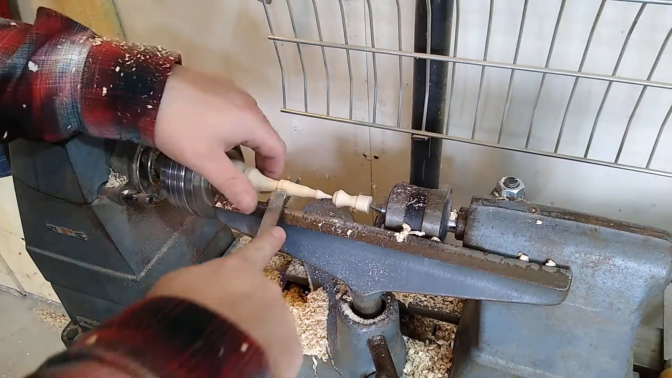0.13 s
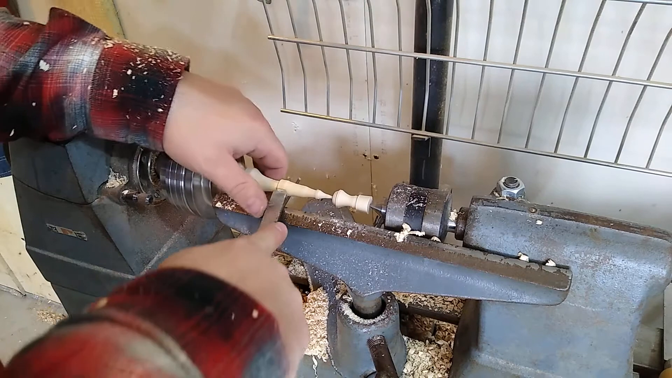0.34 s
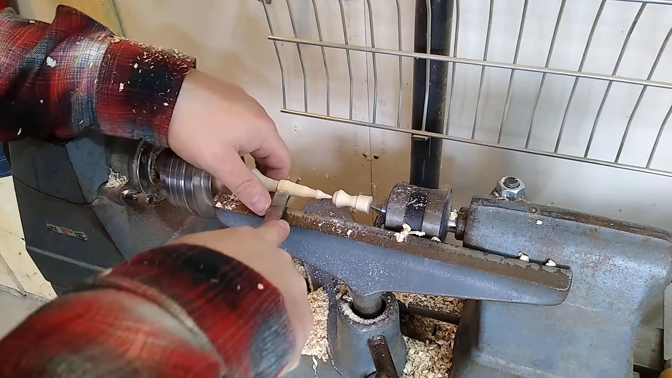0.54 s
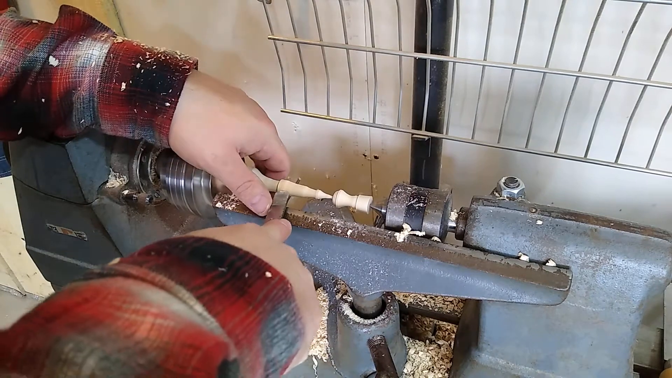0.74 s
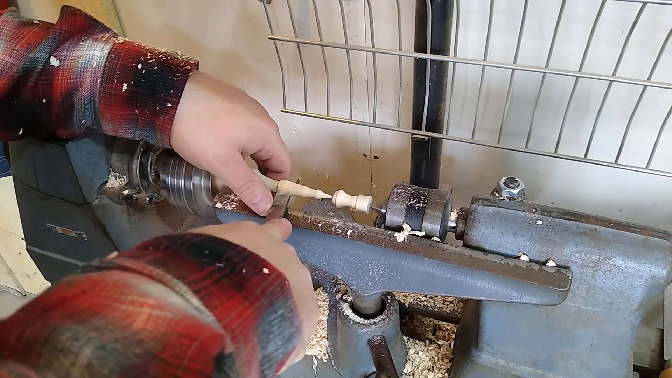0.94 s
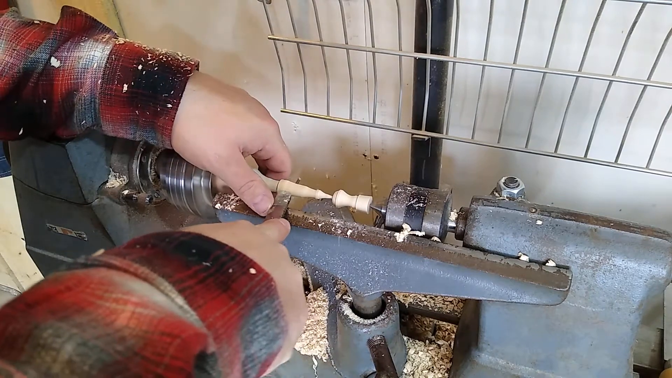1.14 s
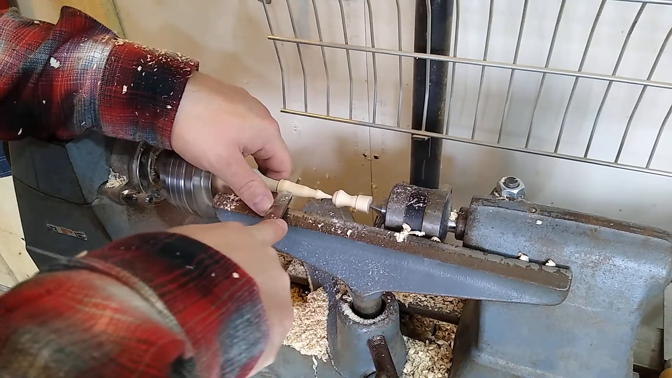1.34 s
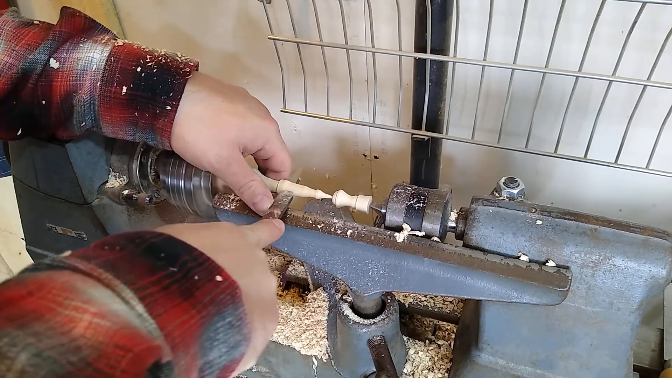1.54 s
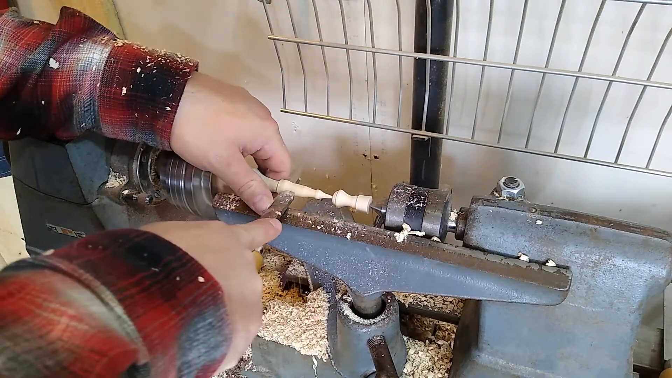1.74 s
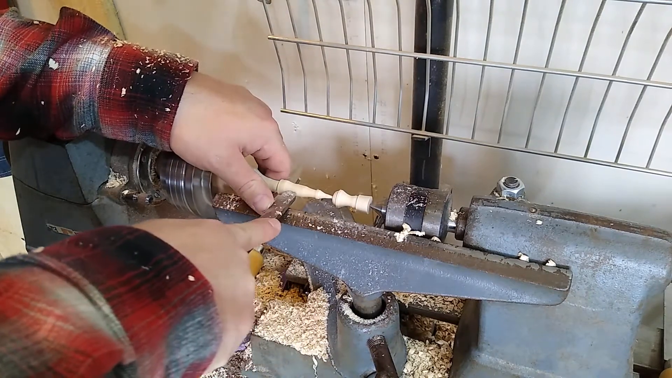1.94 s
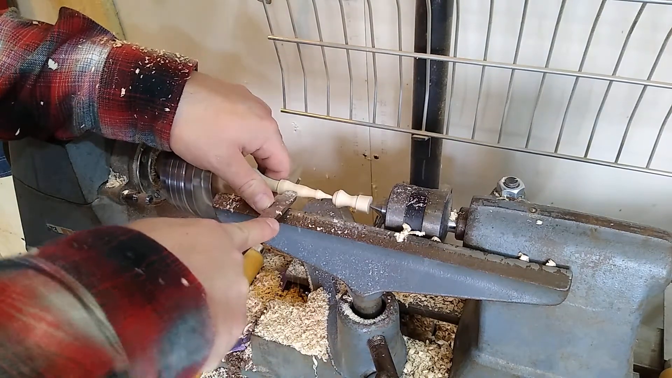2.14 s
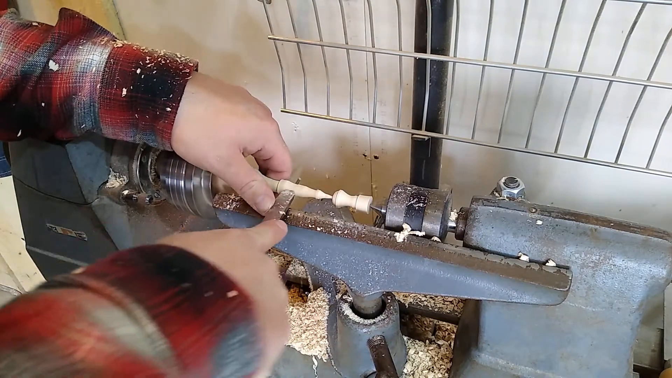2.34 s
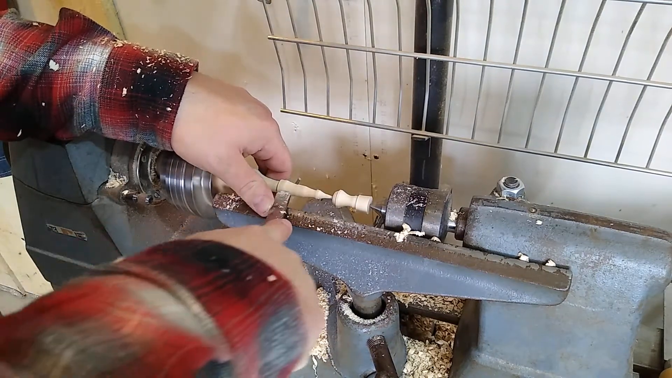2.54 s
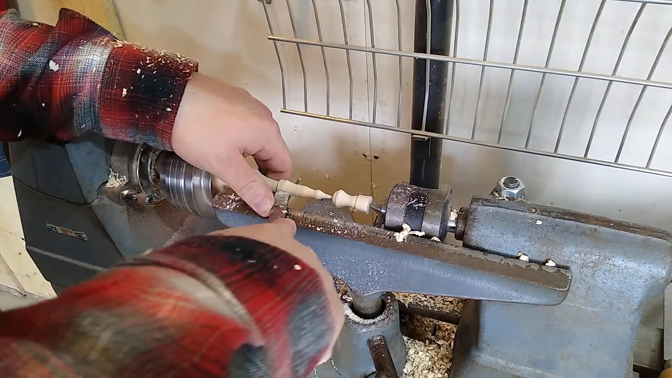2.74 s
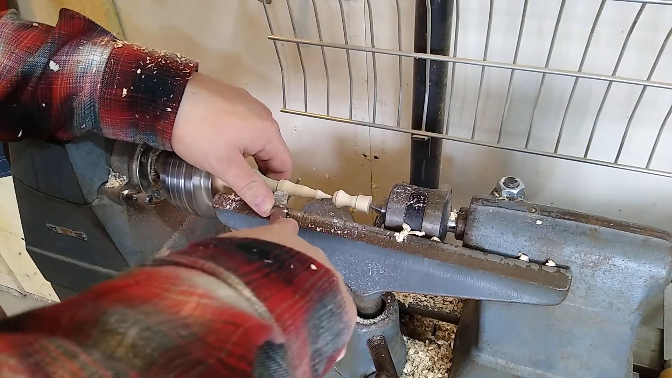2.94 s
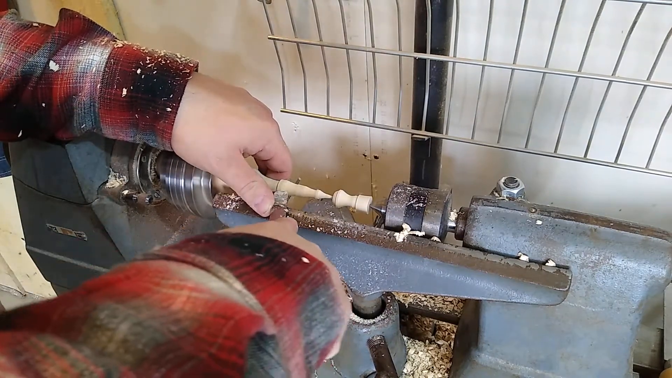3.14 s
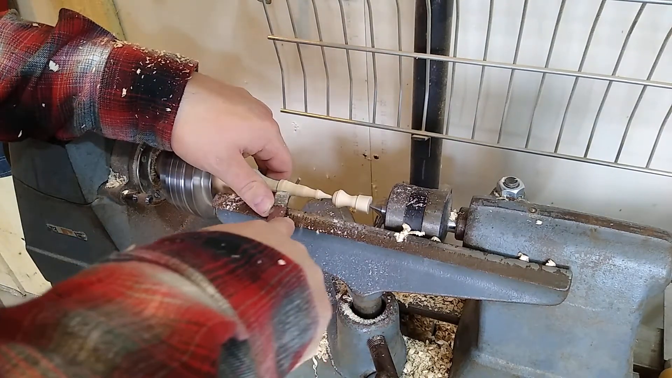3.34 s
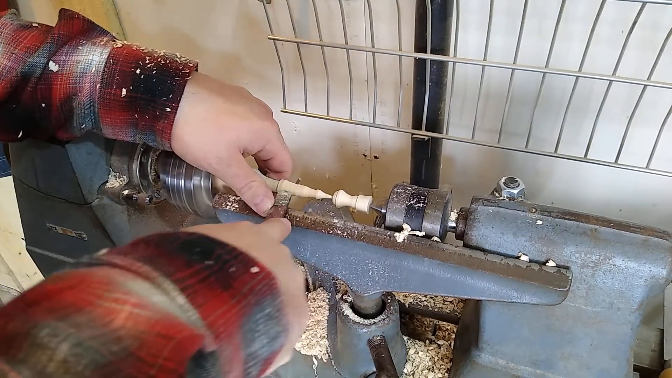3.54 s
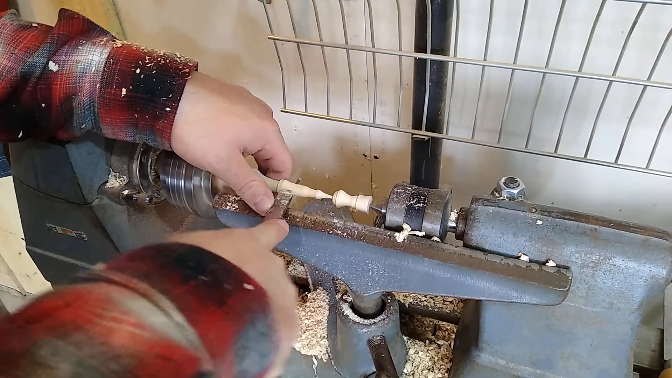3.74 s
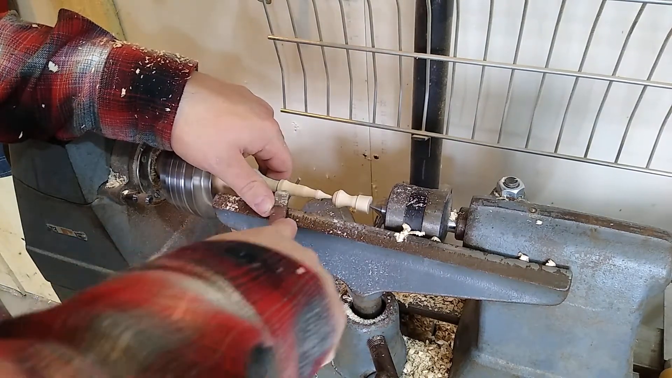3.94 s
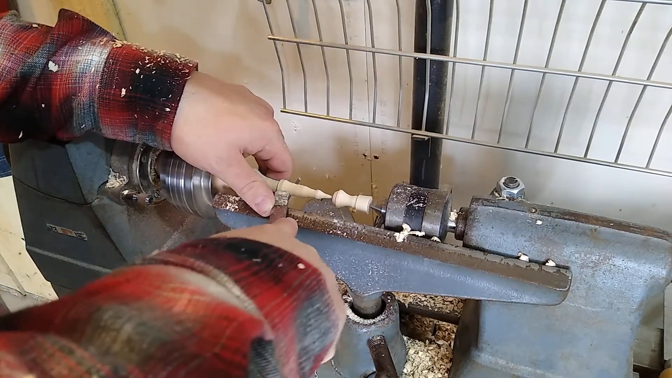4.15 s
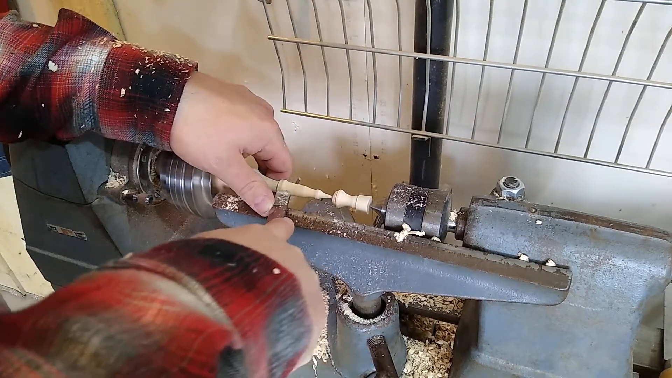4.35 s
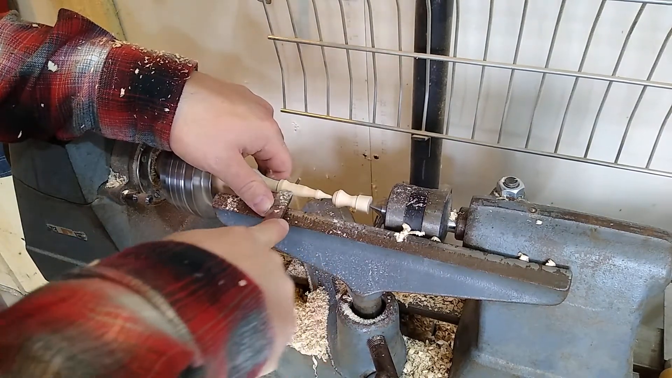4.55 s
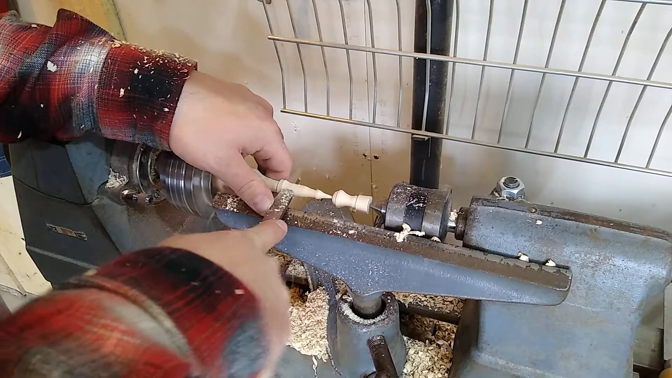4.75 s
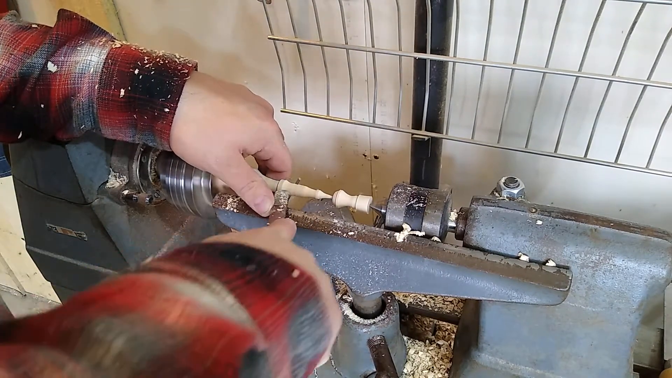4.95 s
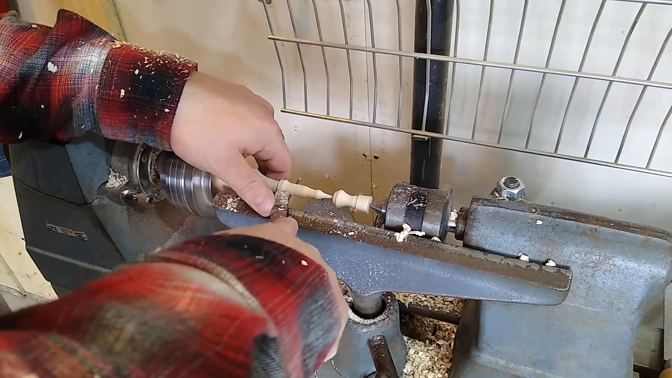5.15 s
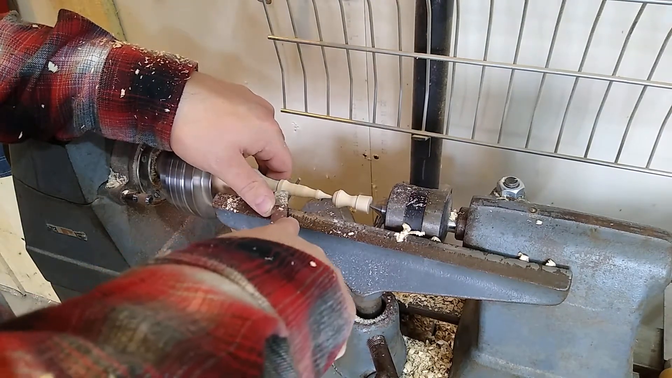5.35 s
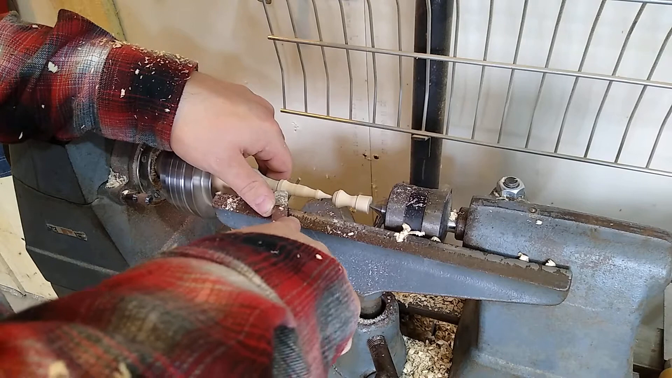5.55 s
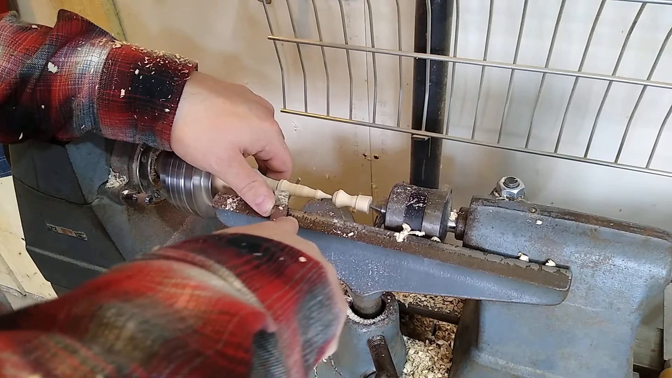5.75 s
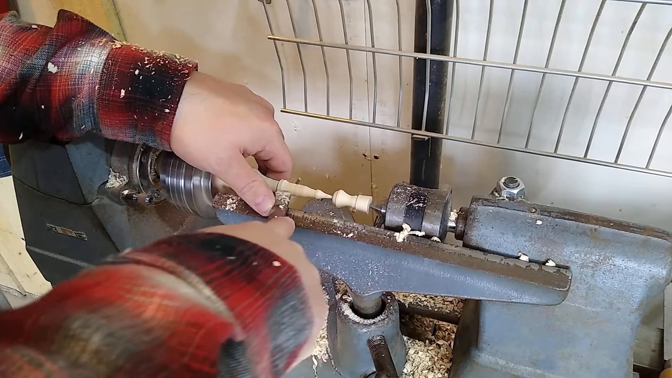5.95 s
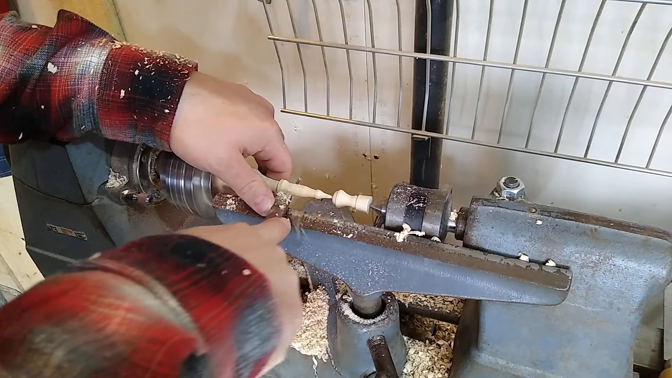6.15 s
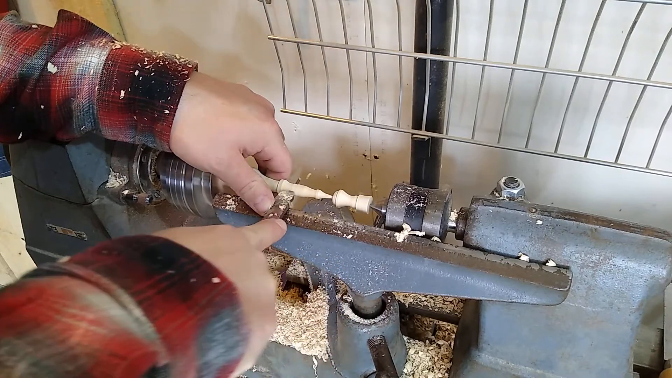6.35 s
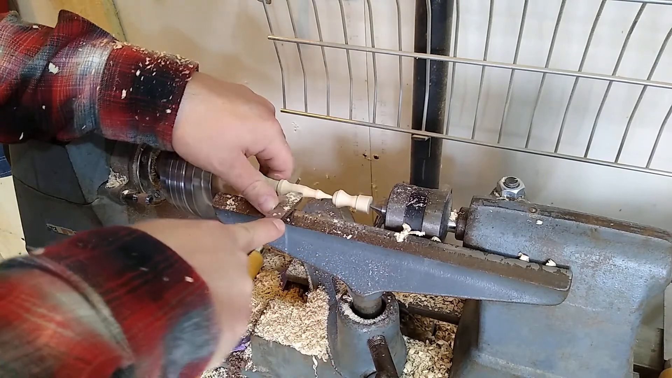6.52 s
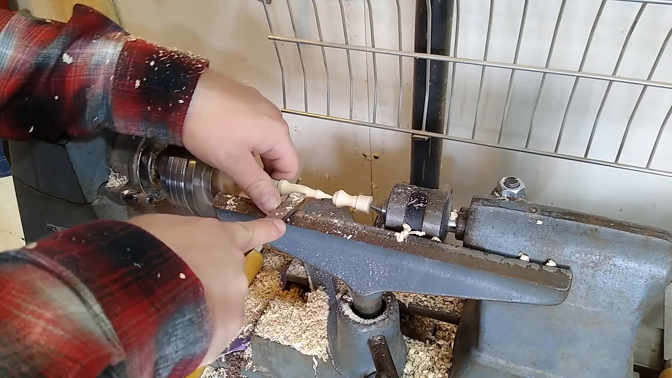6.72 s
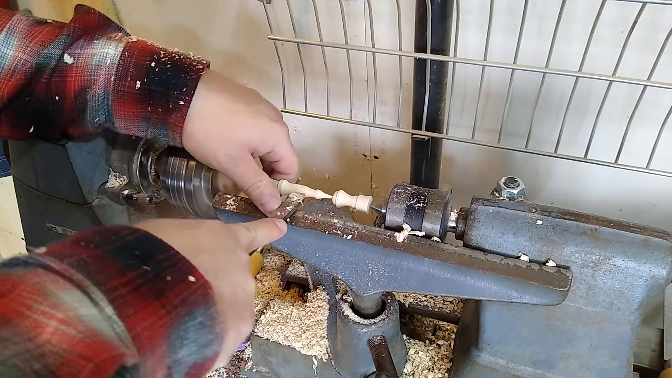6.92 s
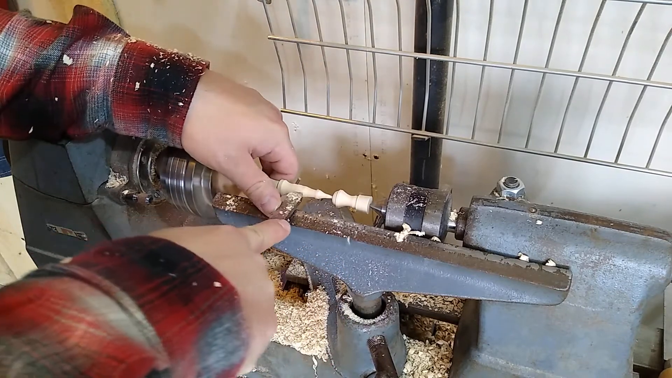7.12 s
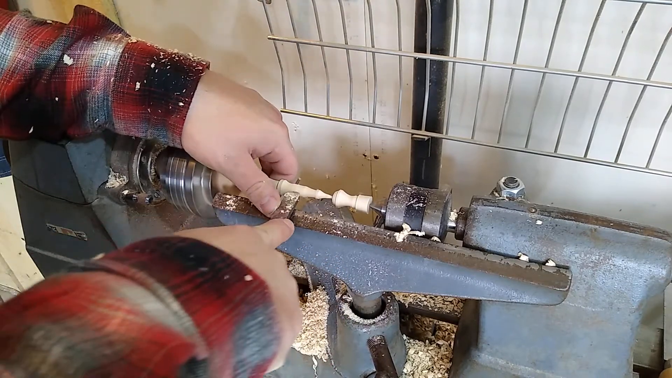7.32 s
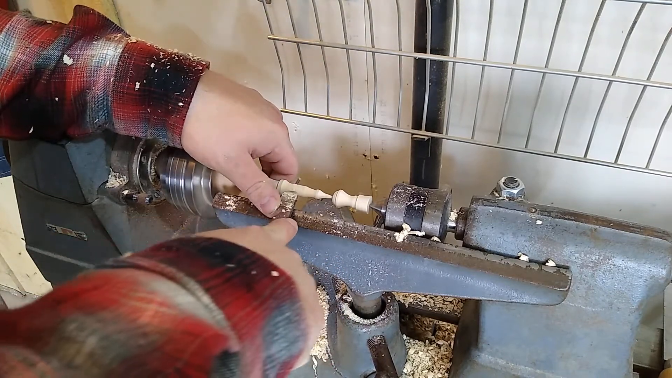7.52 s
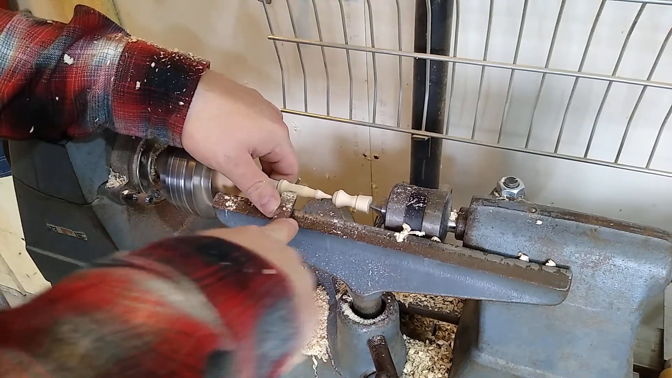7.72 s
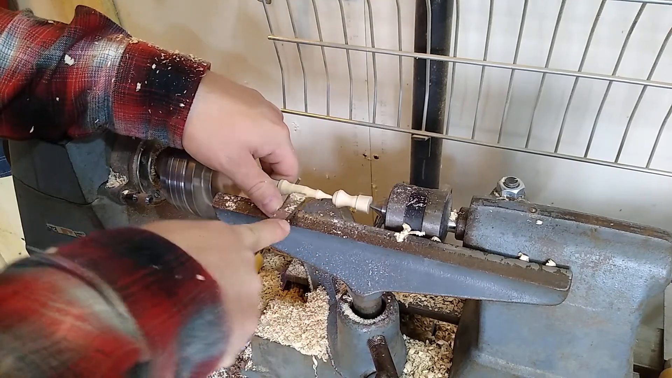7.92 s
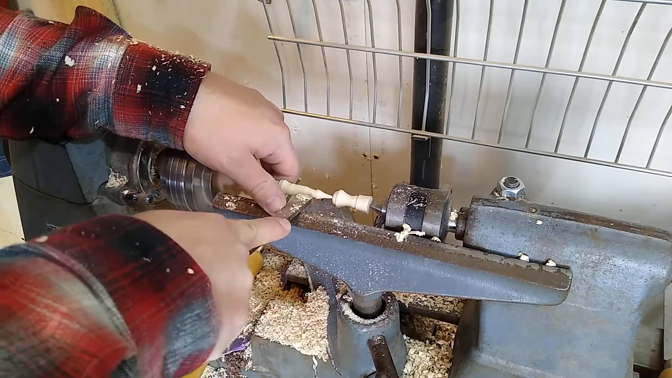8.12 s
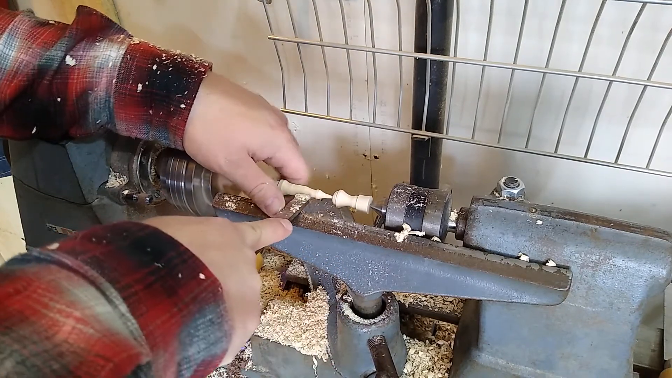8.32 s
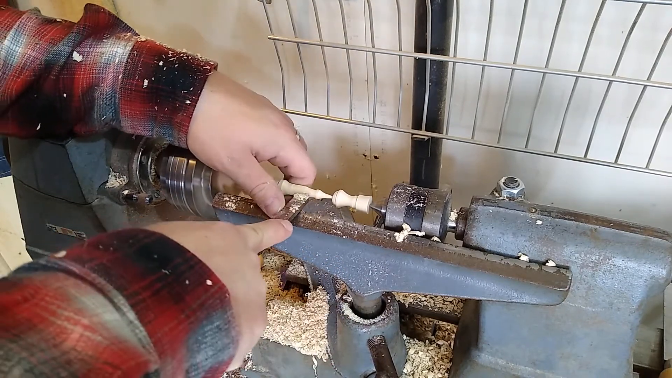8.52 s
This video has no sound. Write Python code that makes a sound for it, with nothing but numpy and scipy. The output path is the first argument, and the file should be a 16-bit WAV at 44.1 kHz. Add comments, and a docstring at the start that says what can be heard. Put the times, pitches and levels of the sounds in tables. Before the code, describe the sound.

A wood lathe runs in a small workshop, its motor humming and bearings whirring while the drive belt gives faint, regular chirps. After about half a second a hand tool scuffs the spinning wood, then cuts in a string of closely spaced passes. Each is a pulsing, rasping scrape with high metallic ringing, at times flaring into buzzing chatter. Two soft, dull bumps come through the stand. The sound is close and fairly dry.

```python
"""Turning a spindle on a wood lathe

In a small workshop the motor hums, the bearings whirr and spots on the drive belt chirp on each loop.
A hand-held tool leans into a thin spinning spindle in several passes. Tearing fibres scrape and set
the tool, its rest and the wood ringing, in pulses tied to each turn; at times the shank chatters.
The edge scuffs twice as it meets the wood, and two soft bumps thud through the stand."""
import sys
import numpy as np
from scipy import signal
from scipy.fft import rfft, irfft, next_fast_len
from scipy.io import wavfile
from scipy.ndimage import uniform_filter1d, map_coordinates

SR = 44100
rng = np.random.default_rng(int(sys.argv[2]) if len(sys.argv) > 2 else 0)


def to_wav(sig):
    """Store sig (one row per channel, or 1-D mono) as 16-bit WAV at the path in sys.argv[1].

    Samples outside -1..1 are clipped; the rate is SR.
    """
    pcm = np.clip(np.atleast_2d(sig), -1, 1) * 32767
    pcm = np.round(pcm).astype(np.int16)
    wavfile.write(sys.argv[1], SR, pcm.T)  # frames by channels


N = 378378
T = np.arange(N) / SR

# motor tones: pitch_hz, rms_db
MOTOR_TONES = [(120.03, -49), (140.2, -63.5)]
# tone colour of the bearings and of the scrape: frequency_hz, level_db
WHIRR_SPECTRUM = [(28, -37.5), (58, -6.5), (105, -1), (240, -3.5), (340, 6.5), (540, 3), (680, 6.5),
                  (1200, 4), (1850, 3.5), (2500, 2), (4200, -4.5), (5800, -5), (6800, -10.5), (7650, -8),
                  (8400, -26)]
SCRAPE_SPECTRUM = [(120, -37), (260, -20.5), (350, -6.5), (520, -8), (860, -3.5), (1200, 4.5), (1650, 1),
                   (2300, 0), (3300, -1.5), (4000, -8.5), (5200, -3), (6400, -35.5), (7500, -9.5),
                   (8400, -31.5)]
# resonances of the housing, iron bed, tool rest, wood and tool steel: pitch_hz, width_hz, level_db
HOUSING_MODES = [(667, 16, -2.5), (889, 32, -4), (939, 30, -7.5), (1069, 21, 2), (1154, 24, -4.5),
                 (1347, 22, -6), (1616, 24, -2.5), (1694, 25, -8.5), (4595, 310, -10), (4830, 300, -6.5),
                 (4850, 180, -9.5)]
BED_MODES = [(332, 18, -5), (425.6, 60, -2.5), (577.6, 11, 0), (661, 30, -3), (761.6, 3.6, 3),
             (1155, 33, 0), (1272, 34, 3.5), (1460, 20, 7), (1610, 120, -5.5), (1878, 50, 4),
             (2125, 42, 2.5), (3465, 33, -0.5), (3630, 60, 1.5), (3870, 75, -5)]
REST_MODES = [(2917, 70, 2), (2940, 28, -4)]
WOOD_MODES = [(2456, 68, -0.5), (2552, 210, -5.5)]
SHANK_MODES = [(981, 26, 0), (1042, 36, -12)]
BLADE_MODES = [(3982, 76, 0), (4160, 61, 1)]
EDGE_MODES = [(4520, 94, -12), (4535, 84, -10.5), (4573, 56, 1.5), (4780, 150, -6.5), (4950, 170, -15)]
TIP_MODES = [(5040, 200, 0), (5240, 300, -5)]
# soft bumps against the lathe: start_s, peak_db, pitch_hz
STAND_BUMPS = [(3.625, -44, 143), (6.95, -41, 76)]
# squeaky belt spots that come and go: first_s, level_db, loudest_s, fade_db_per_s
SQUEAKY_SPOTS = [(.022, -27, 1.0, 1.6), (.117, -26.5, 4.6, 1.6), (.22, -35, 8, .6)]
# the tool is set down or catches: start_s, level_db, t60_s
TOOL_TOUCHES = [(0.56, -25.5, 0.16), (6.844, -20.5, 0.12)]
# passes of the tool, and how well that spot of the wood drives each part: start_s, lean_s, hold_s,
# ease_s, entry_pressure_db, full_pressure_db, shank_db, edge_db, wood_db, rest_db, blade_db, tip_db
TOOL_PASSES = [(0.56, 0.028, 0.018, 0.068, -6, -8, -10, -6.5, -1.5, 1, -5, 5),
               (0.722, 0.5, 0.567, 0.13, -15, -2.5, -1.5, -0.5, 1.5, 1.5, -1.5, 5.5),
               (1.784, 0.056, 0.43, 0.096, -3, -1.6, 0, -3, -4.5, -11, -7.5, -4.5),
               (2.569, .02, .03, .03, -12, -11.5, -6, 1, 1.5, 2, 0, -3),
               (2.651, 0.57, 0.023, .06, -12.5, -6.5, 2.5, 4.5, 2.5, 3, 8.5, 1.5),
               (3.164, .12, .15, .33, -9, -1.5, 2, 3.5, 1, 1.5, -1.5, 3.5),
               (3.379, 0.14, 0.28, 0.14, -10, -0.5, -2.5, -3, -4, 0.5, -0.5, 1),
               (3.934, .45, 0.1, 0.057, -10, -5, 1, 1.5, 2, 4, 6.5, -9),
               (4.325, 0.18, 0.17, 0.31, -11, 0.5, -2.5, -3, 0.5, -2, -4.5, -4.5),
               (5.027, 0.53, 0.11, .2, -11.5, -10, 4.5, 3, 4.5, 7.5, 10.5, 3),
               (5.634, .44, 0.15, .1, -7, -0.96, 1.5, -2, 1, 1, 3, -4),
               (6.22, 0.074, 0.38, 0.17, -2.5, -2.5, -0.5, 0, 1, -2, 2.5, -9),
               (6.88, 0.053, 0.621, 0.088, -7, -2.5, 2, 1, -1, -4.5, 1.5, 0.5),
               (7.558, 0.23, .06, 0.32, -4.5, -3, -2, -1, -1.5, -4, 4.5, -5),
               (7.92, .15, .03, 0.083, -8, -2.5, -3.5, 1, -0.5, -3.5, -4, -1),
               (8.172, 0.057, 0.33, .1, -7.5, -4, 2.5, -3.5, -6, -7, -1, -8)]
PARTS = ("shank", "edge", "wood", "rest", "blade", "tip")
# the shank flares into chatter: peak_s, rise_db
SHANK_FLARES = [(1.23, 5), (1.45, 7.5), (1.74, 7.5), (2.25, 3), (3.42, 3.5), (4.48, 2.5), (5.36, 7.5),
                (5.829, 5.5), (6.44, 4.5), (6.659, 5.5), (7.12, 2.5), (7.31, 4), (7.46, 3)]
# how each part answers the hand: base_db, db_per_pressure_db, drift_db_per_s while the tool is held
SCRAPE_LAW, WOOD_LAW, REST_LAW = (-35, 0.92, 1.8), (-30, 1.07, -2), (-30, 1.38, -13)
SHANK_LAW, BLADE_LAW = (-25.5, 1.23, 0.3), (-28.5, 2.15, -2.2)
EDGE_LAW, TIP_LAW = (-23, 1.34, -1.1), (-36, 1.34, -7.5)

SPINDLE_HZ, BELT_LOOP_S = 24.73, 0.3511


def amp(db):
    """Decibels to gain."""
    return 10 ** (np.asarray(db) / 20)


def unit(x):
    """Scale to rms 1."""
    return x / np.sqrt(np.mean(x ** 2) + 1e-20)


def wobble(rate):
    """A smooth random curve, rate knots a second."""
    return map_coordinates(rng.standard_normal(int(N * rate / SR) + 4), [T * rate])


def swell(peak_s, width_s):
    """A smooth rise and fall of height 1."""
    return np.exp(-np.minimum(((T - peak_s) / width_s) ** 2, 20))


def filtered(x, response):
    """EQ x with a gain curve over frequency."""
    size = next_fast_len(N + SR // 2)
    return irfft(rfft(x, size) * response(np.fft.rfftfreq(size, 1 / SR)), size)[:N]


def coloured(x, spectrum):
    """Give x a smooth tone colour, at rms 1."""
    hz, db = np.transpose(spectrum)
    return unit(filtered(x, lambda f: amp(np.interp(np.log(f + 1), np.log(hz), db))))


def ringing(x, modes):
    """Play x through a set of resonances, at rms 1."""
    return unit(filtered(x, lambda f: sum(
        amp(db) * 1j * f * width / (hz * hz - f * f + 1j * f * width) for hz, width, db in modes)))


def band(x, low_hz, high_hz):
    """Keep one band with steep skirts, at rms 1."""
    return unit(filtered(x, lambda f: 1 / (1 + (low_hz / (f + 1)) ** 10) / (1 + (f / high_hz) ** 10)))


def machine():
    """Mains hum of the motor and the whirr of the bearings in their housing."""
    hum = sum(amp(db) * np.sqrt(2) * np.sin(2 * np.pi * hz * T) for hz, db in MOTOR_TONES)
    rolling = amp(0.97 * wobble(25))
    whirr = amp(-43) * coloured(rng.standard_normal(N), WHIRR_SPECTRUM)
    housing = amp(-40) * band(ringing(rng.standard_normal(N), HOUSING_MODES), 660, 4960)
    return hum + rolling * (whirr + housing)


def bumps(width_s=0.011):
    """Dull, low thuds of the stand."""
    return sum(amp(db) * np.exp(-((T - start - width_s / 2) / width_s) ** 2)
               * np.sin(2 * np.pi * hz * (T - start)) for start, db, hz in STAND_BUMPS)


def belt(trim_db=-5, pitch_hz=1950, width_s=0.012, scatter_db=3.9):
    """Spots of the belt squeak briefly each time they pass the pulley, never twice alike."""
    chirps = np.zeros(N)
    for first_s, db, loudest_s, fade in SQUEAKY_SPOTS:
        loop = np.round((T - first_s) / BELT_LOOP_S).astype(int)
        chance = rng.standard_normal(loop.max() + 2)[loop]
        spot_db = trim_db + db - fade * np.abs(T - loudest_s) + scatter_db * chance
        chirps += amp(spot_db) * swell(first_s + loop * BELT_LOOP_S, width_s)
    flutter = amp(2 * wobble(300))
    wavering_hz = pitch_hz + 38 * wobble(300)
    return chirps * flutter * np.sin(2 * np.pi * np.cumsum(wavering_hz) / SR)


def touches():
    """The edge meets the wood with a short scuff that rings the steel."""
    push = sum(amp(db - 60 * np.abs(T - start) / t60) * (T >= start) for start, db, t60 in TOOL_TOUCHES)
    force = rng.standard_normal(N)
    steel = band(ringing(force, EDGE_MODES), 4300, 5000)
    scuff = amp(-11) * coloured(force, SCRAPE_SPECTRUM)
    return push * amp(-5) * (steel + scuff)


def driven_db(law, part=None, attack_s=0.013, ease_db=9):
    """One part's level follows the pressure as the hand leans in, holds and eases off in each pass."""
    base_db, growth, drift = law
    power = np.zeros(N)
    for start, lean, hold, ease, entry_db, full_db, *coupling_db in TOOL_PASSES:
        first = int(start * SR)
        t = T[first:first + 2 * SR] - start
        pressure_db = np.interp(t, [0, lean], [entry_db, full_db])
        pressure_db -= ease_db * np.maximum(t - lean - hold, 0) / ease
        db = base_db + growth * pressure_db + drift * np.clip(t - lean, 0, hold)
        if part is not None:
            db += coupling_db[PARTS.index(part)]
        power[first:first + len(t)] += (np.clip(t / attack_s, 0, 1) * amp(db)) ** 2
    return 10 * np.log10(power + 1e-12)


def turning(depth_db, peak_turn, per_turn):
    """Tremolo locked to the spindle, at even power."""
    gain = amp(depth_db * np.cos(2 * np.pi * per_turn * (SPINDLE_HZ * T - peak_turn)))
    return gain / np.sqrt(uniform_filter1d(gain ** 2, SR // 5))


def fibres(bite, grain_db=2.5):
    """The force of tearing fibres: dense snaps of uneven size."""
    return rng.standard_normal(N) * bite * amp(grain_db * wobble(1400))


def chatter(x, grip, window_s):
    """Friction feeds a vibration and also caps it: slow swells level out, the fast flutter stays."""
    power = np.abs(uniform_filter1d(x * x, int(window_s * SR))) + 1e-3
    return unit(x / power ** (grip / 2))


def shank_chatter(bite, scrape_db):
    """Stick-slip bends the shank; the lighter the cut, the more the tool bounces once a turn."""
    slip = ringing(fibres(bite, grain_db=2), [(1005, 120, 0)])
    ring = chatter(ringing(slip, SHANK_MODES), grip=0.8, window_s=0.07)
    lighter_db = SCRAPE_LAW[0] - scrape_db
    bounce_db = np.clip(0.8 + 0.45 * lighter_db, 0, 5.5)
    bounce = turning(bounce_db, peak_turn=0.06, per_turn=1) * turning(0.8, peak_turn=0.03, per_turn=2)
    flare_db = sum(db * swell(peak_s, width_s=0.058) for peak_s, db in SHANK_FLARES)
    return amp(driven_db(SHANK_LAW, "shank") + flare_db) * ring * bounce


def cutting():
    """One uneven bite of the edge drives the scrape and every ringing part."""
    bite = amp(0.69 * wobble(45) + 0.9 * wobble(220))
    # the piece runs slightly off centre, and the edge meets end grain twice a turn
    runout = turning(1.32, peak_turn=0.8, per_turn=1) * turning(0.95, peak_turn=0.44, per_turn=2)
    end_grain = turning(4, peak_turn=0.012, per_turn=2)
    scrape_db = driven_db(SCRAPE_LAW)
    chips = coloured(fibres(bite), SCRAPE_SPECTRUM)
    bed = band(ringing(fibres(bite), BED_MODES), 270, 4700)
    scrape = amp(scrape_db) * (amp(3.5) * chips + amp(1.5) * bed)
    shank = shank_chatter(bite, scrape_db)
    edge = band(ringing(fibres(bite * runout), EDGE_MODES), 4360, 5100)
    edge = chatter(edge, grip=0.1, window_s=0.065)
    tip = band(ringing(fibres(bite * runout), TIP_MODES), 4700, 5900)
    wood = band(ringing(fibres(bite * end_grain, grain_db=3.5), WOOD_MODES), 1900, 2900)
    wood = chatter(wood, grip=0.6, window_s=0.049)
    rest = band(ringing(fibres(bite), REST_MODES), 2650, 3200)
    blade = band(ringing(fibres(bite * runout, grain_db=-0.5), BLADE_MODES), 3300, 4000)
    # a high overtone of the edge swells with its main ring and spits on one side of the piece
    high_spot = end_grain * turning(2, peak_turn=0.48, per_turn=1)
    sizzle = band(ringing(fibres(bite * high_spot, grain_db=1), [(7300, 290, 0)]), 6400, 8000)
    return (scrape + shank
            + amp(driven_db(EDGE_LAW, "edge")) * (edge + amp(-24) * sizzle)
            + amp(driven_db(BLADE_LAW, "blade")) * blade
            + amp(driven_db(TIP_LAW, "tip")) * tip
            + amp(driven_db(WOOD_LAW, "wood")) * wood
            + amp(driven_db(REST_LAW, "rest")) * rest)


def workshop(x, t60_s, wet_db):
    """The close walls add a short tail."""
    t = T[:SR // 2]
    tail = rng.standard_normal(len(t)) * amp(-60 * t / t60_s) * (t > 0.004)
    return x + amp(wet_db) * signal.fftconvolve(x, tail / np.linalg.norm(tail))[:N]


def scene():
    """Tool work and belt in the room, over the steady machine and the bumps."""
    work = workshop(cutting() + touches() + belt(), t60_s=0.2, wet_db=-19)
    return (work + machine() + bumps())[None]


def record(dry, low_hz=38, rolloff_hz=8200, top_hz=8520):
    """Final EQ: the deepest bass drops away; the treble rolls off and ends steeply."""
    def response(f):
        return (f < top_hz) / (1 + (f / rolloff_hz) ** 40) / (1 + (low_hz / (f + 1)) ** 6)
    return filtered(dry[0], response)[None]


dry = scene()
out = record(dry)
to_wav(out)
```